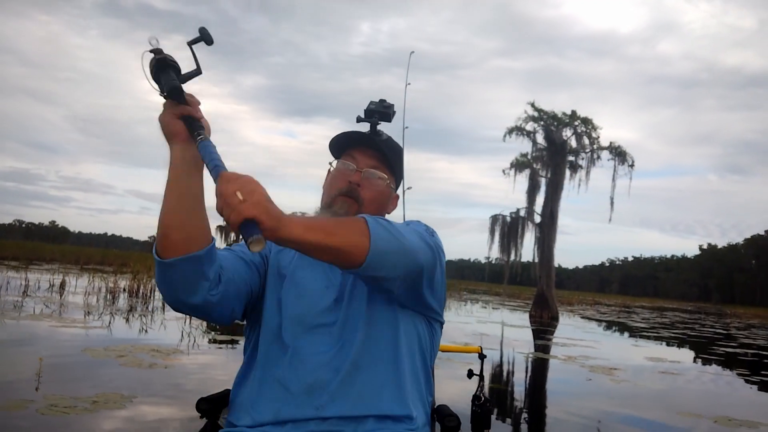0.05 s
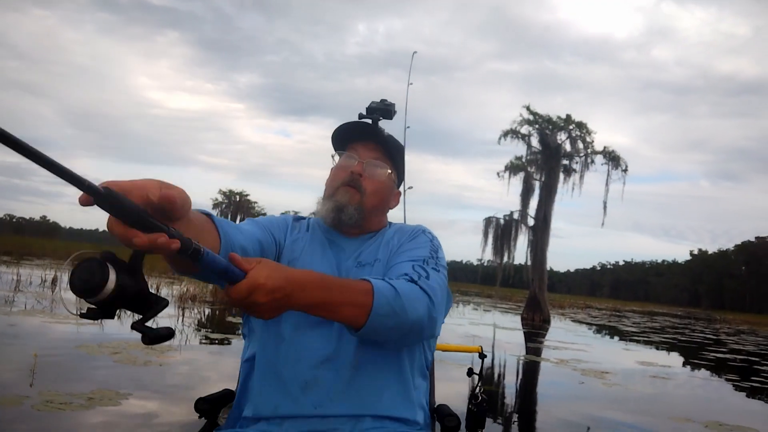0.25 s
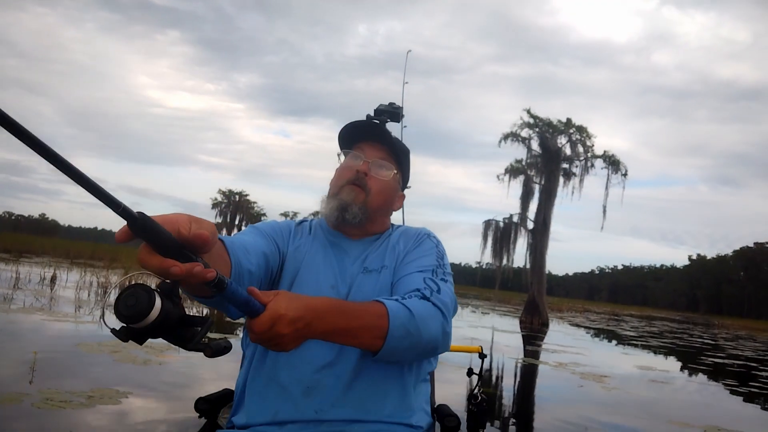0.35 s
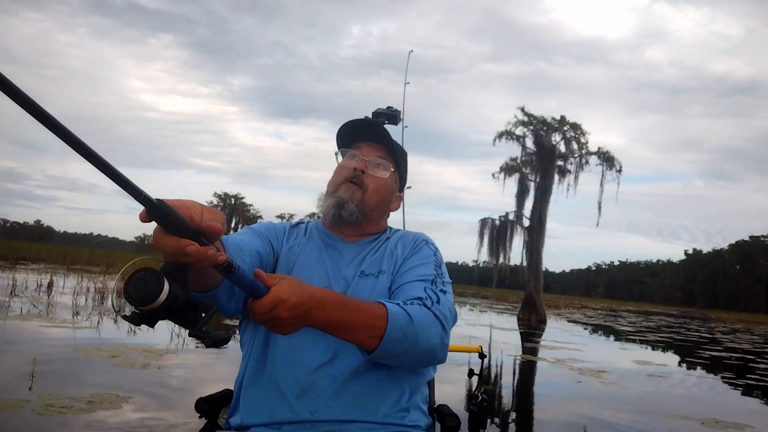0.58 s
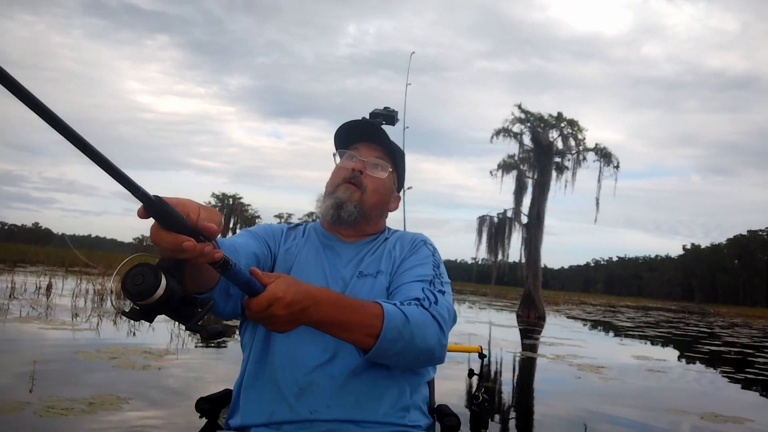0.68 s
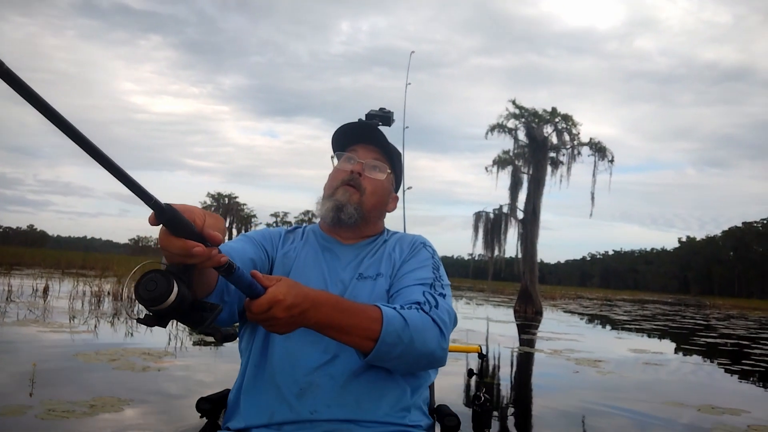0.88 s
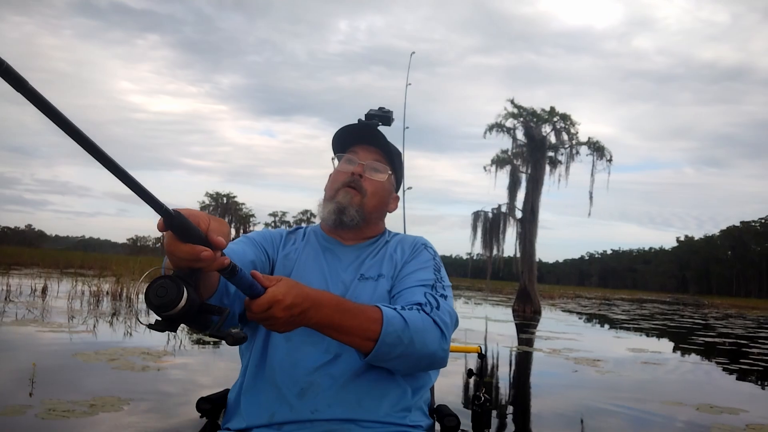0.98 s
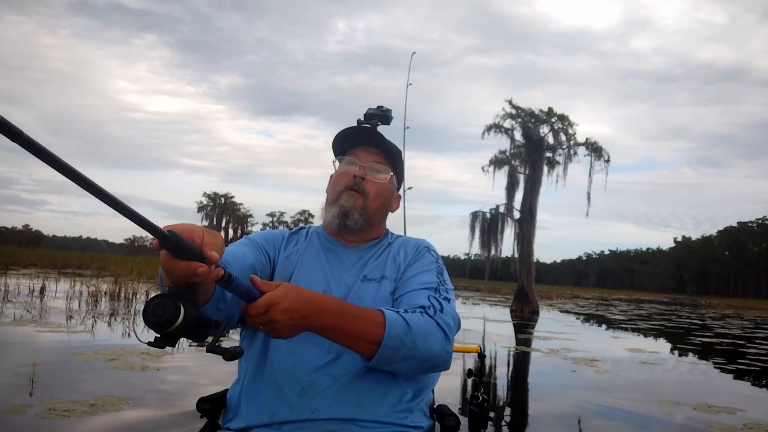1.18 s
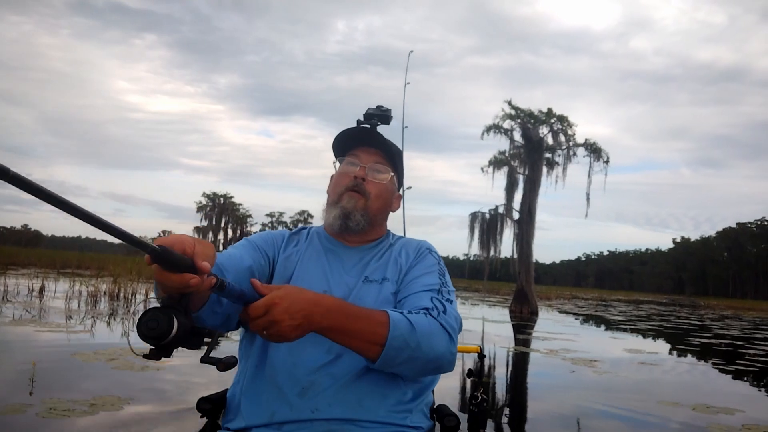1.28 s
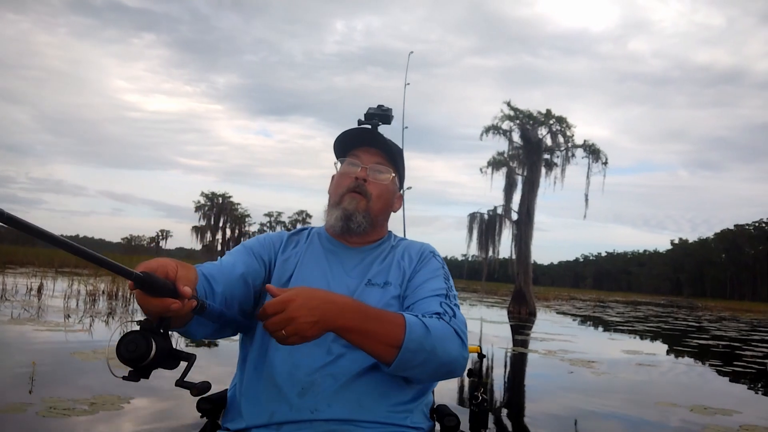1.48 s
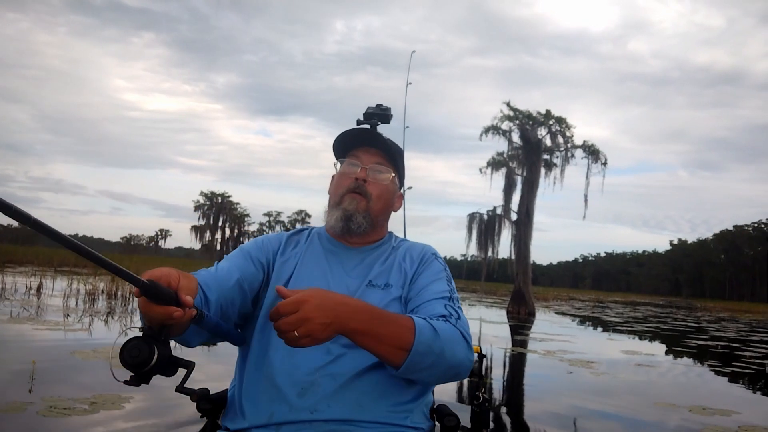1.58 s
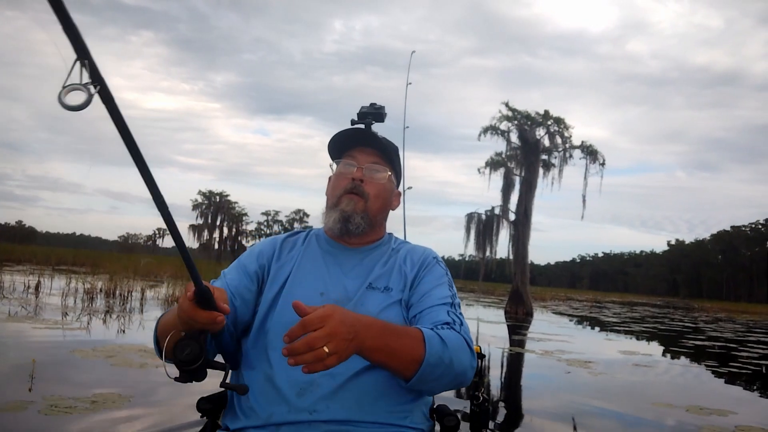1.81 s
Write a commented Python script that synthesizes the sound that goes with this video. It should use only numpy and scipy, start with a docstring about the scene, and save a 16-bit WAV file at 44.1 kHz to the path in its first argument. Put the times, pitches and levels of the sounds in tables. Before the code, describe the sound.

A fishing rod is cast, heard close on open water. Light knocks of rod and reel lead to harder clacks around 0.2 s, then a short swish and high zip at 0.24 s. Line hisses, rattles and flutters, strongest until 0.7 s, growing duller and thinning to sparse ticks by 1.45 s. Faint rumble and insects remain; a distant bird chirps at 1.7 s.

```python
"""A cast with a spinning rod from a small boat on open water, close to the microphone.
Over a low rumble and insect fizz, rod and reel knock in the hands and the rod swishes forward.
The line zips off the finger, then hisses, rattles and flutters through the guides as coloured noise,
duller as it slows, until single coils tick off the spool. The rod shudders and a guide sings faintly,
loose coils slap the rod, and near the end one distant bird chirps."""
import sys
import numpy as np
from scipy import signal
from scipy.fft import rfft, irfft
from scipy.io import wavfile
from scipy.ndimage import uniform_filter1d

SR = 44100
rng = np.random.default_rng(int(sys.argv[2]) if len(sys.argv) > 2 else 0)


def digitize_waveform(pressure):
    """Quantize a signal to 16-bit integers and store it at the path in sys.argv[1].

    Rows of a 2-D input are taken as channels; values are limited to [-1, 1].
    """
    field = np.atleast_2d(pressure).T
    bounded = np.clip(field, -1, 1)
    quanta = np.round(bounded * 32767).astype(np.int16)
    wavfile.write(sys.argv[1], SR, quanta)


N = 81585
TIME, HZ = np.arange(N) / SR, np.fft.rfftfreq(N, 1 / SR)
RELEASE_S, SLOWING_S = 0.24, 1.05  # from the release on, the line's speed dies away exponentially
ROD_LAG_S, LINE_LAG_S = 0.00036, 0.000143  # the left microphone port hears later


def amp(db):
    """Decibels to gain."""
    return 10 ** (np.asarray(db) / 20)


def evened(x):
    """Scales to an rms of 1."""
    return x / np.sqrt(np.mean(x ** 2) + 1e-20)


def read(points):
    """A table over frequency, read at every bin along a logarithmic axis."""
    hz, value = np.transpose(points)
    return np.interp(np.log(HZ + 1), np.log(hz), value)


def panned(x, pan_db):
    """Tilts a pair by left minus right dB, one value or one per frequency bin."""
    tilt_db = np.array([pan_db + 0 * HZ, -pan_db - 0 * HZ]) / 2
    return irfft(rfft(x) * amp(tilt_db), N)


# How alike the two ports hear a noise. Each row: frequency in Hz, likeness from 0 to 1.
LIKENESS = [(100, 0.95), (600, 0.93), (1500, 0.51), (5000, 0.19), (12000, 0.29)]


def friction(envelope, spectrum, lag_s):
    """Random micro-impacts under an envelope, coloured, as the two microphone ports hear them."""
    right, other = rfft(rng.standard_normal((2, N)) * envelope)
    alike = np.clip(read(LIKENESS), 0, 1)
    left = alike * right + np.sqrt(1 - alike ** 2) * other
    left = left * np.exp(-2j * np.pi * HZ * lag_s)
    return irfft(np.array([left, right]) * evened(amp(read(spectrum))), N)


def burst(start, rise_s):
    """A quick swell and fall that peaks at 1."""
    u = np.maximum(TIME - start, 0) / rise_s
    return u * np.exp(1 - u)


def dying(start, t60, t=TIME):
    """A sudden start and an exponential decay, 60 dB down after t60 seconds."""
    return (t >= start) * amp(-60 * np.maximum(t - start, 0) / t60)


def ring(start, hz, db, t60):
    """One mode of the tackle, a dying sine at both ports."""
    t = TIME - np.array([[ROD_LAG_S], [0]])
    return amp(db) * dying(start, t60, t) * np.sin(2 * np.pi * hz * (t - start))


def flicker(rate_hz, depth_db):
    """A randomly wavering gain: smoothed noise in dB."""
    smoothed = rfft(rng.standard_normal(N)) * np.exp(-(HZ / rate_hz) ** 2)
    return evened(amp(depth_db * evened(irfft(smoothed, N))))


# Colour of the far rumble. Each row: frequency in Hz, level in dB.
RUMBLE_COLOUR = [(25, -14), (45, -18.5), (75, 2.5), (135, 2.5), (180, -4.5), (220, -6), (400, -16.5),
                 (900, -30.5), (2200, -29.5), (6000, -45)]
# Colour of the insects. Each row: frequency in Hz, level in dB.
INSECT_COLOUR = [(1000, -10), (2300, -13), (3200, -4), (4200, -3), (5300, -3), (6500, -1), (7700, -13),
                 (10500, -24), (15500, -15)]
# Where the insects sit. Each row: frequency in Hz, left minus right in dB.
INSECT_PAN = [(2500, 1), (4300, 4), (6500, 5), (8500, 3), (14000, 4)]
RUMBLE_DB, INSECTS_DB = -70.5, -68


def marsh():
    """A low far rumble and the steady fizz of insects, both shaped noise."""
    rumble = friction(amp(RUMBLE_DB), RUMBLE_COLOUR, lag_s=0)
    fizz = irfft(rfft(rng.standard_normal((2, N))) * amp(read(INSECT_COLOUR)), N)
    insects = panned(evened(fizz) * flicker(rate_hz=66, depth_db=1.84), read(INSECT_PAN))
    return rumble + amp(INSECTS_DB) * insects


# Knocks of rod and reel in the hands.
# Each row: start in seconds, clack level in dB, dull thud level in dB, thud pitch in Hz.
KNOCKS = [(.0215, -44, -59.5, 704), (.047, -70, -62, 405), (.144, -51.5, -83, 720), (.170, -68, -41.5, 774),
          (.182, -46, -42, 1032), (.197, -30.5, -29.5, 553), (.203, -31, -42, 542), (0.2424, -22, -37, 353)]
# Colour of the clacks. Each row: frequency in Hz, level in dB.
CLACK_COLOUR = [(50, -15), (120, -21), (300, -2), (700, 5), (950, -0.5), (1250, 7.5), (1700, -1), (2500, 3),
                (3500, -8.5), (4300, -4), (8000, -14), (15500, -36)]
# Ring of the reel after the hardest knock. Each row: mode in Hz, level in dB, t60 in seconds.
REEL_MODES = [(1870, -68, 0.12), (2256, -33, 0.085), (3573, -31.5, 0.058), (4718, -44, 0.17),
              (5420, -34, 0.033)]
CLACK_T60, THUD_T60 = 0.013, 0.048  # s


def knocks():
    """Rod and reel shift in the grip: a clack and a thud each; the hardest rings the reel."""
    strikes = sum(amp(db) * dying(start, CLACK_T60) for start, db, _, _ in KNOCKS)
    clacks = friction(strikes, CLACK_COLOUR, ROD_LAG_S)
    thuds = sum(ring(start, hz, db, THUD_T60) for start, _, db, hz in KNOCKS)
    hardest = max(KNOCKS, key=lambda row: row[1])[0]
    reel = sum(ring(hardest, *mode) for mode in REEL_MODES)
    return clacks + thuds + reel


# Colour of the air round the rod. Each row: frequency in Hz, level in dB.
SWISH_COLOUR = [(40, -51), (130, -5), (220, -14), (380, -6), (750, 1.5), (1200, -2.5), (2400, 1),
                (4600, -0.5), (7000, -5.5), (10500, -13.5), (13000, -12.5), (15500, -13.5)]
SWING_PEAK_S, SWING_DB = 0.2485, -30  # fastest moment and the level there
SWING_RISE, SWING_FALL = 211, 610  # before and after it, dB per s
WIND_UP_S, WIND_UP_RISE = 0.21, 283  # until this moment the swing builds faster, by extra dB per s


def swish():
    """Air tears round the rod, building to the fastest moment and stopping quickly."""
    early, late = np.maximum(SWING_PEAK_S - TIME, 0), np.maximum(TIME - SWING_PEAK_S, 0)
    wind_up = np.maximum(WIND_UP_S - TIME, 0)
    db = SWING_DB - SWING_RISE * early - SWING_FALL * late - WIND_UP_RISE * wind_up
    envelope = amp(db) * flicker(rate_hz=300, depth_db=2.5)
    return panned(friction(envelope, SWISH_COLOUR, ROD_LAG_S), pan_db=-1.5)


COILS_PER_S, COIL_JITTER = 170, 0.393  # rate at full speed; timing spread in coils
COIL_SPREAD_DB, COIL_S = 3.5, 0.001  # spread of strength; rise of one flick in seconds
COIL_RUB = 1.25  # steady rubbing between the flicks at full speed; falls with the square of the speed


def coils(speed):
    """One flick per coil leaving the spool, uneven in time and strength; at speed they merge into rubbing."""
    turns = np.cumsum(COILS_PER_S * speed) / SR
    jitter, size = rng.standard_normal((1000, 2))[:int(turns[-1])].T
    at = np.searchsorted(turns, np.arange(len(size)) + COIL_JITTER * jitter)
    strength = amp(COIL_SPREAD_DB * np.clip(size, -2, 2))
    impulses = np.bincount(np.minimum(at, N - 1), strength, N)
    flicks = signal.fftconvolve(impulses, burst(0, COIL_S))[:N]
    return evened(COIL_RUB * speed ** 2 + flicks)


# Fixed colour of the spool lip. Each row: frequency in Hz, level in dB.
SPOOL_COLOUR = [(2200, -3), (3200, 0), (5200, 0), (7300, -4), (8600, 2), (10500, 1), (12500, -1),
                (15500, 1)]
HISS_HZ, HISS_OCTAVES = 15300, 0.25  # centre at the release, width of the band
HISS_SKIRT_DB = -6  # broad skirt under the band


def hiss(envelope):
    """Line rubbing over the spool lip: a broad band that sinks with the speed, coloured by the spool."""
    hz, t, noise = signal.stft(rng.standard_normal((2, N)), SR, nperseg=256)
    centre = HISS_HZ * np.exp(-(t - RELEASE_S) / SLOWING_S)
    octaves = np.log2((hz[:, None] + 1) / centre)
    peak = np.exp(-0.5 * (octaves / HISS_OCTAVES) ** 2)
    band = peak + amp(HISS_SKIRT_DB) / (1 + (octaves / 2) ** 2)
    band *= amp(np.interp(hz, HZ, read(SPOOL_COLOUR)))[:, None]
    level_band = band / np.sqrt(np.mean(band ** 2, axis=0))  # the sinking leaves the loudness alone
    return envelope * signal.istft(noise * level_band, SR, nperseg=256)[1][:, :N]


# The running line. Each row: time in seconds, level of the rubbing hiss in dB,
# level of the coil rattle in dB, level of the flutter in the guides in dB.
LINE_LEVELS = [(.16, -105, -105, -75.5), (0.213, -65, -37, -51.5), (.28, -42.5, -50.5, -49.5),
               (.33, -44.5, -45, -52), (.39, -45, -40, -49), (.465, -46.5, -40.5, -54),
               (.5, -47.5, -40.5, -52), (.58, -46, -43, -60), (.71, -48.5, -47.5, -64.5),
               (.78, -52, -49, -66), (.93, -54.5, -54, -66), (1.02, -61.5, -58, -67.5),
               (1.19, -63, -63, -71.5), (1.27, -65, -81, -72.5), (1.5, -71, -68.5, -74.5),
               (1.85, -79, -58, -84)]
# The springing rod whips the line against the guides. Each row: start in seconds, level in dB.
WHIPS = [(0.371, -43), (.421, -47), (0.487, -47), (0.622, -52.5)]
# Colour of the coil rattle. Each row: frequency in Hz, level in dB.
RATTLE_COLOUR = [(1000, -28), (4000, -23), (7000, -13.5), (10000, -6.5), (12500, -18), (14200, -1.5),
                 (15400, 2), (16200, 0.5)]
# Where rattle and slaps sit. Each row: frequency in Hz, left minus right in dB.
RATTLE_PAN = [(4000, 5), (7500, -3.5), (11500, -1.5), (13800, -15), (15500, 3)]
# Colour of the flutter in the guides. Each row: frequency in Hz, level in dB.
FLUTTER_COLOUR = [(40, -53), (100, 0), (170, -4.5), (245, -5), (330, 0), (520, 1), (1000, -7), (1400, -4),
                  (1900, -6.5), (3000, -10), (3900, -20.5), (5200, -6), (8000, -17), (15000, -36)]
WHIP_S = 0.0039  # rise of a whip


def line():
    """The running line hisses, rattles off the spool and flutters against the guides."""
    s, *levels = np.transpose(LINE_LEVELS)
    rub, rattle, flutter = (amp(np.interp(TIME, s, db)) for db in levels)
    flicks = coils(np.exp(-np.maximum(TIME - RELEASE_S, 0) / SLOWING_S))
    whips = sum(amp(db) * burst(start, WHIP_S) for start, db in WHIPS)
    rubbing = panned(hiss(rub * flicker(rate_hz=230, depth_db=2.5)), pan_db=-1.8)
    rattling = panned(friction(rattle * flicks, RATTLE_COLOUR, LINE_LAG_S), read(RATTLE_PAN))
    beating = np.hypot(flutter, whips) * evened(abs(flicks) ** 0.5)
    fluttering = panned(friction(beating, FLUTTER_COLOUR, lag_s=0.000301), pan_db=-2)
    return rubbing + rattling + fluttering


# The line zips off the fingertip. Each row: start in seconds, strength in dB.
ZIPS = [(.2311, 0), (.2337, 0), (.2416, -7)]
# Colour of the zips. Each row: frequency in Hz, level in dB.
ZIP_COLOUR = [(3000, -45), (11000, -26), (13200, -11.5), (15200, 0), (16200, 0.5)]
ZIP_DB, ZIP_S, ZIP_PAN_DB = -12.5, 0.00048, -10  # level at strength 0, rise, left minus right


def zips():
    """The taut line slips off the finger in thin squeaks, very short bursts of high noise."""
    slips = sum(amp(ZIP_DB + db) * burst(start, ZIP_S) for start, db in ZIPS)
    return panned(friction(slips, ZIP_COLOUR, ROD_LAG_S), ZIP_PAN_DB)


# Colour of the shuddering rod. Each row: frequency in Hz, level in dB.
QUIVER_COLOUR = [(35, -22), (75, -3.5), (115, -3), (170, -8), (240, -8), (600, -21.5), (3000, -77)]
QUIVER_DB, QUIVER_T60 = -57.5, 3.64  # level at the release, decay in seconds


def quiver():
    """The rod blank shudders as the line pulls through it, a low sound that dies slowly."""
    shudder = amp(QUIVER_DB) * dying(RELEASE_S, QUIVER_T60)
    return panned(friction(shudder, QUIVER_COLOUR, ROD_LAG_S), pan_db=-1)


GUIDE_HZ, GUIDE_WIDTH_HZ = 1388, 86  # centre and half width of the wavering note
GUIDE_DB, GUIDE_T60 = -72.5, 6  # level at the release, decay in seconds


def guide():
    """The line sings faintly in one guide ring: narrow noise that wavers like a note."""
    resonance = 1 / (1 + ((HZ - GUIDE_HZ) / GUIDE_WIDTH_HZ) ** 2)
    note = irfft(rfft(rng.standard_normal(N)) * resonance, N)
    return amp(GUIDE_DB) * evened(note) * dying(RELEASE_S, GUIDE_T60)


# Coils that slap the rod harder. Each row: start in seconds, level in dB.
SLAPS = [(0.4882, -33), (0.499, -29.5), (0.5597, -34), (0.586, -35), (0.689, -33.5), (0.903, -48),
         (.960, -46), (0.9841, -32.5), (1.011, -53), (1.116, -49), (1.1465, -52), (1.193, -51),
         (1.2445, -46.5), (1.291, -52), (1.330, -46), (1.362, -46.5), (1.4475, -49.5)]
# Colour of the slaps. Each row: frequency in Hz, level in dB.
SLAP_COLOUR = [(1000, -22.5), (5000, -20.5), (8500, -9.5), (11500, -11.5), (14000, -6.5), (15400, -1),
               (16200, -2.5)]
SLAP_S, SLAP_PAN_DB = 0.00065, -2  # rise of a tick; tilt added to that of the rattle


def slaps():
    """Loose coils slap the rod with a bright tick."""
    hits = sum(amp(db) * burst(start, SLAP_S) for start, db in SLAPS)
    return panned(friction(hits, SLAP_COLOUR, LINE_LAG_S), read(RATTLE_PAN) + SLAP_PAN_DB)


CHIRP_S, CHIRP_LENGTH_S, CHIRP_DB = 1.715, 0.075, -63
CHIRP_FROM_HZ, CHIRP_TO_HZ = 5450, 4700


def bird():
    """One faint falling chirp, blurred by distance into a random waver at each port."""
    u = np.clip((TIME - CHIRP_S) / CHIRP_LENGTH_S, 0, 1)
    hz = CHIRP_FROM_HZ + (CHIRP_TO_HZ - CHIRP_FROM_HZ) * u ** 2
    tone = np.sin(2 * np.pi * np.cumsum(hz) / SR)
    blur = evened(uniform_filter1d(rng.standard_normal((2, N)), size=60))
    return amp(CHIRP_DB) * np.sin(np.pi * u) * tone * blur


BOAT_DB, BOAT_T60 = -8.5, 0.06  # reflections from the hull and the angler: level, decay in seconds


def boat(x):
    """A short scatter of reflections; open water adds no long tail."""
    hits = rng.random((2, N)) < 3000 / SR  # about 3000 reflections per second
    taps = rng.standard_normal((2, N)) * hits * dying(0.002, BOAT_T60)
    taps /= np.linalg.norm(taps, axis=1, keepdims=True)
    return signal.fftconvolve(x, taps, axes=1)[:, :N]


def scene():
    """The cast, its reflections, the marsh and the bird."""
    cast = knocks() + swish() + line() + zips() + quiver() + guide() + slaps()
    return marsh() + cast + amp(BOAT_DB) * boat(cast) + bird()


LOW_CUT_HZ, EDGE_HZ = 58, 15980


def record(dry):
    """The recorder's low cut and band limit."""
    low_cut = signal.butter(2, LOW_CUT_HZ, "high", fs=SR, output="sos")
    thin = signal.sosfilt(low_cut, dry)
    band_limit = signal.firwin(501, EDGE_HZ, window=("kaiser", 8), fs=SR)
    return signal.oaconvolve(thin, band_limit[None], "same")


dry = scene()
out = record(dry)
digitize_waveform(out)
```